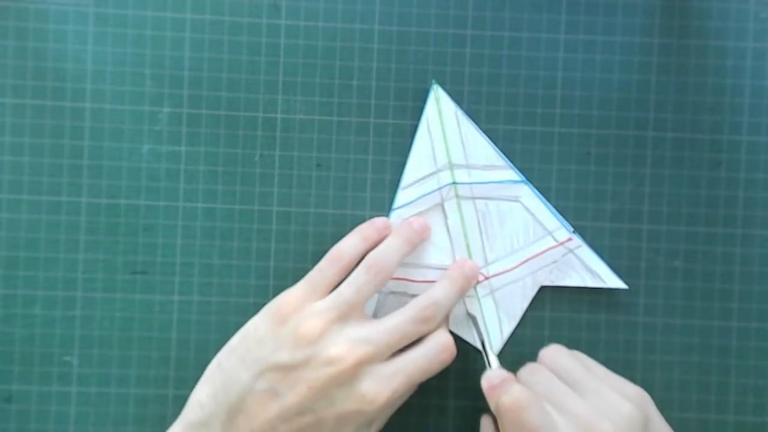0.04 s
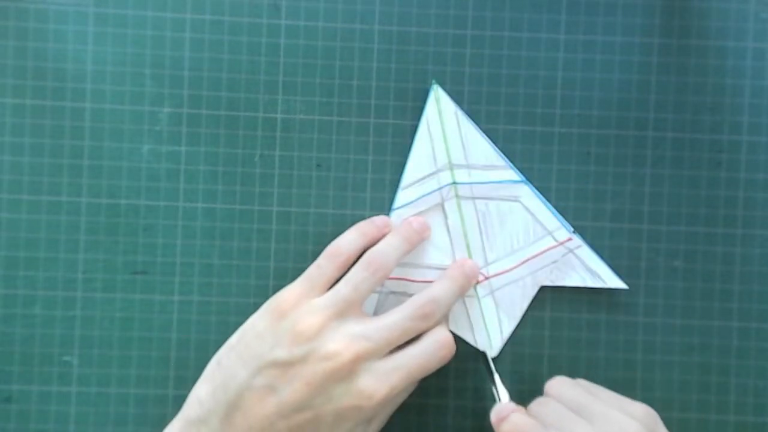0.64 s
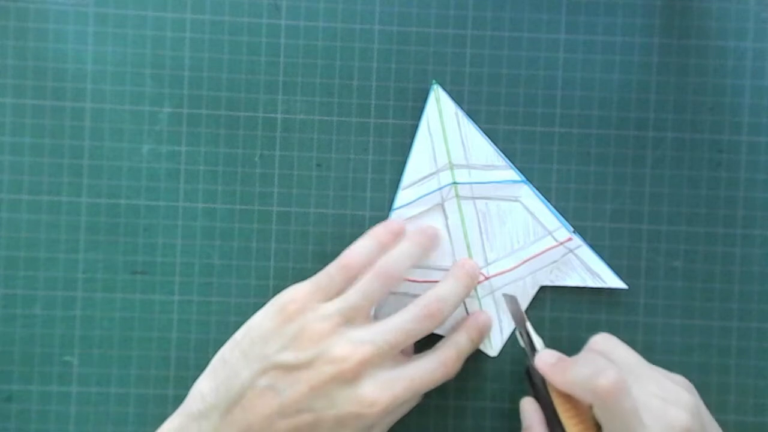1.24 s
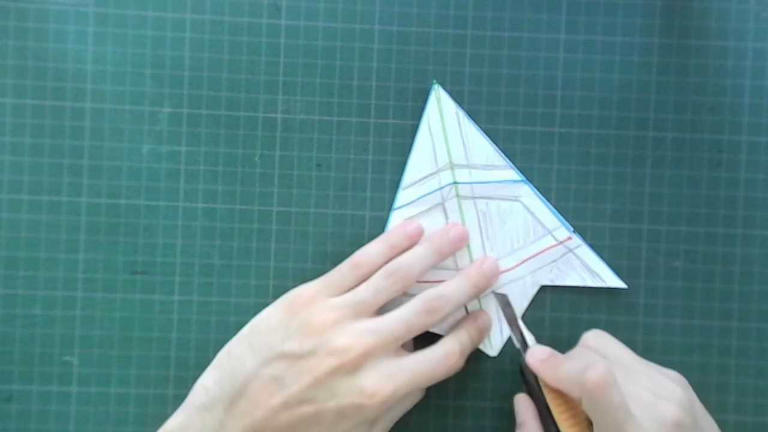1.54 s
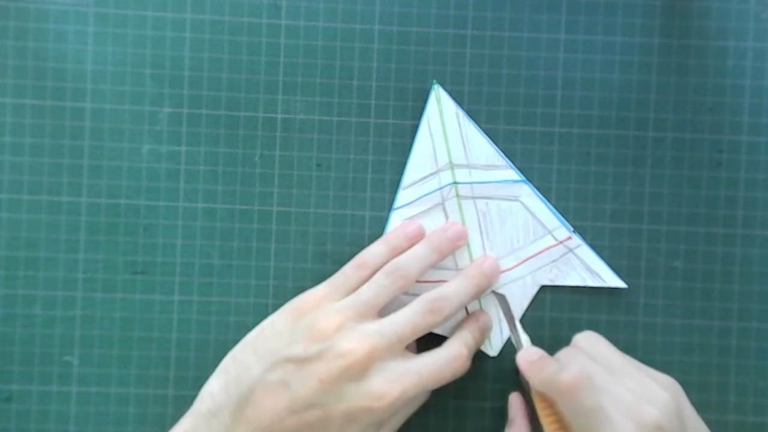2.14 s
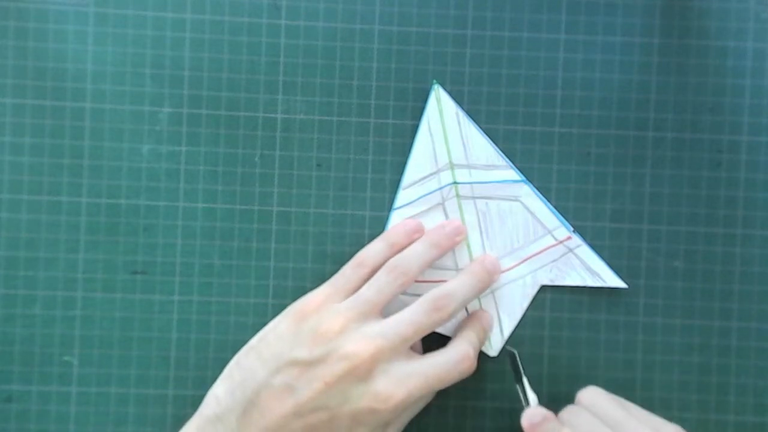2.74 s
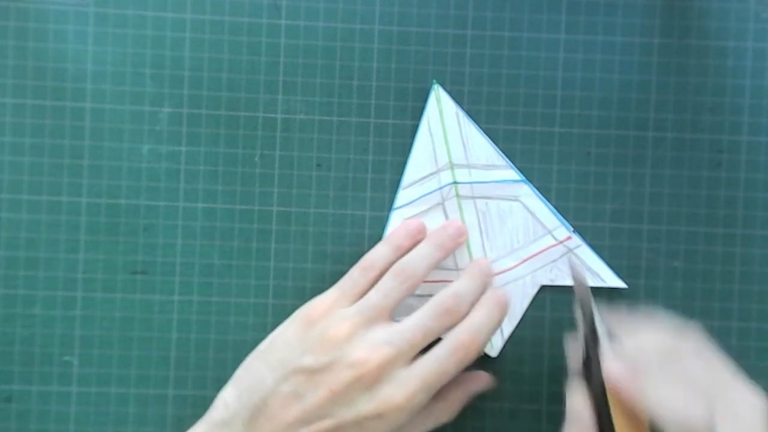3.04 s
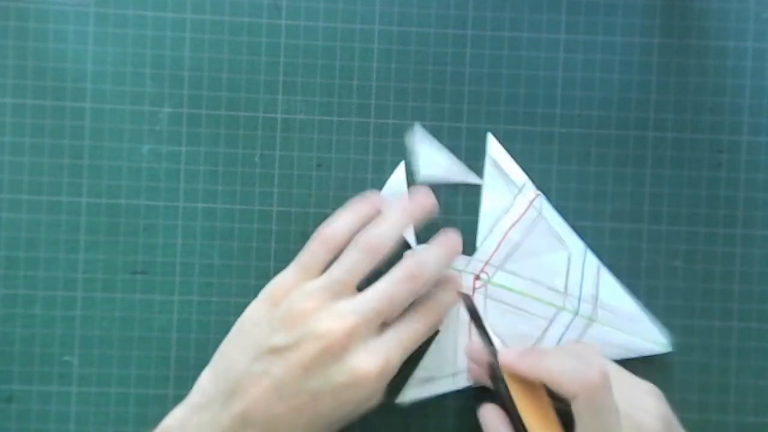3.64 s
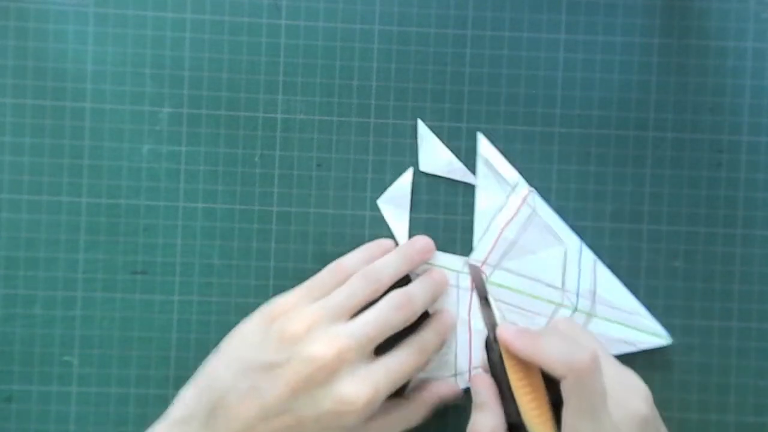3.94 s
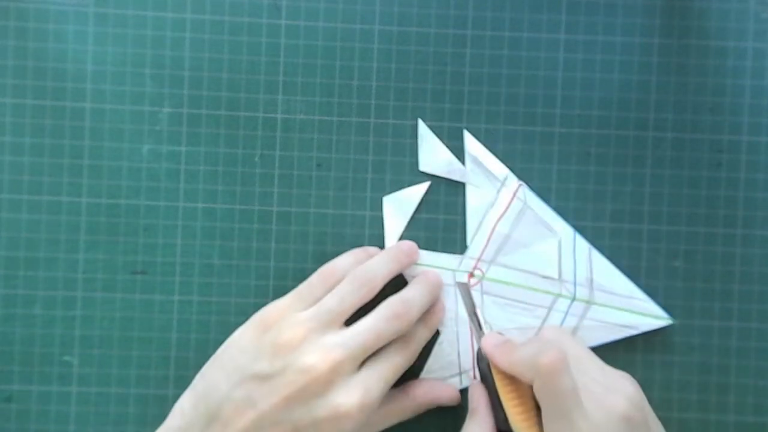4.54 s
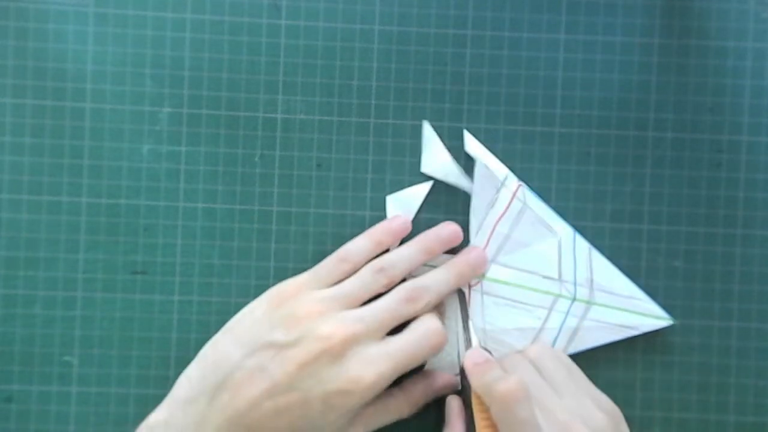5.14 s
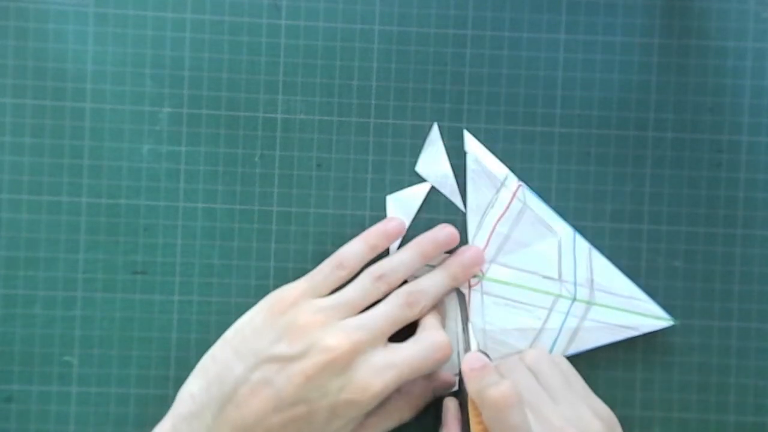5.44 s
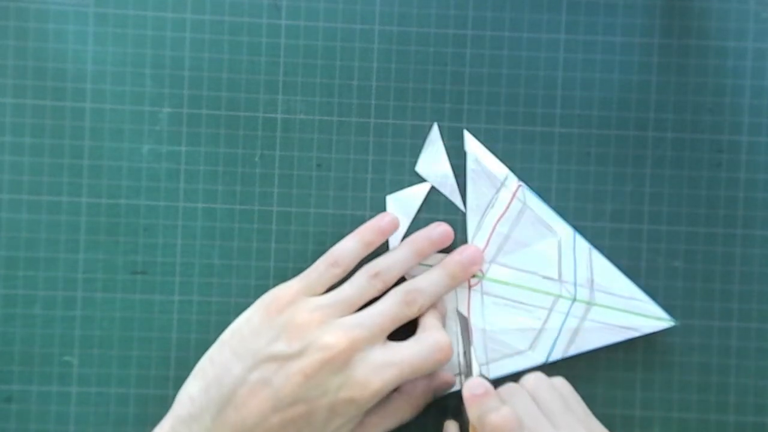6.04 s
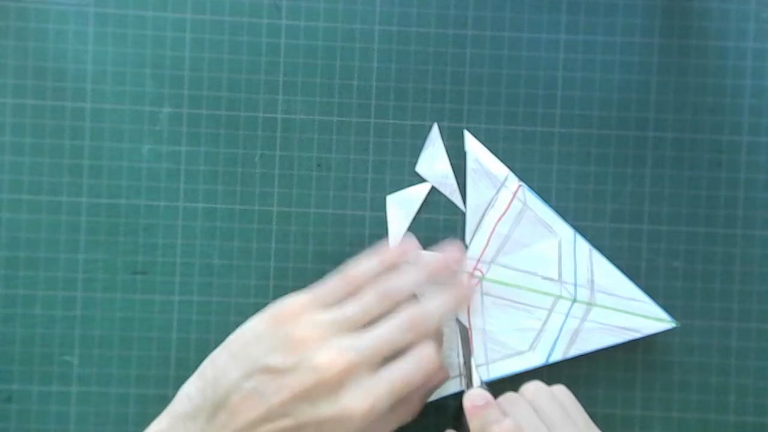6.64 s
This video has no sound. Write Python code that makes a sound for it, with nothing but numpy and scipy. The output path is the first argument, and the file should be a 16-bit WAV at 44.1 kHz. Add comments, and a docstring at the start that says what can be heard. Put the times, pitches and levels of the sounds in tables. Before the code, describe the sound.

Slow, quiet knife strokes cut folded paper indoors, mixed with blade clicks, paper sliding and soft thumps on a rumbling desk.

```python
"""First comes the soft rasp of a craft knife cutting folded paper on a mat, over a low desk rumble.
The blade catches on countless fibres in slow strokes, and the folds tick under the fingers.
Hands bump the desk, which booms softly; the blade snaps over the paper's edges; the sheet is
slid round with a swish, and the knife point taps down. The small room rings after each click."""
import sys
import numpy as np
from scipy import signal
from scipy.fft import rfft, irfft, next_fast_len
from scipy.io import wavfile

SR = 44100
rng = np.random.default_rng(int(sys.argv[2]) if len(sys.argv) > 2 else 0)


def wav_out(sig):
    """Save sig, one row per channel (or a flat mono array), as 16-bit PCM at SR to the path in sys.argv[1]."""
    wavfile.write(sys.argv[1], SR, np.round(np.clip(np.atleast_2d(sig).T, -1, 1) * 32767).astype(np.int16))


N = 303849
TIME, FREQS = np.arange(N) / SR, np.fft.rfftfreq(N, 1 / SR)
TOP_HZ = 15950


def amp(db):
    """Turns decibels into a gain. Gains multiply, so the levels in the tables are relative."""
    return 10 ** (np.asarray(db) / 20)

def unit(x):
    """Scales a signal to an average strength (rms) of 1."""
    return x / np.sqrt(np.mean(x ** 2) + 1e-20)

def read(points, hz):
    """Reads between a table's rows, with frequency spaced in octaves."""
    freqs, values = np.transpose(points)
    return np.interp(np.log(hz + 1), np.log(freqs + 1), values)

def with_peaks(tone, peaks, hz):
    """A broad tone curve with resonant peaks on top, in dB."""
    return read(tone, hz) + sum(db / (1 + (2 * (hz - f) / width) ** 2) for f, width, db in peaks)

def colour(x, db):
    """Turns each frequency of a full-length signal up or down."""
    return irfft(rfft(x) * amp(db), N)

def wander(hz):
    """A random wobble, up to about hz times a second."""
    size = next_fast_len(N, True)
    spectrum = rfft(rng.standard_normal(size)) / (1 + (np.fft.rfftfreq(size, 1 / SR) / hz) ** 4)
    return unit(irfft(spectrum, size)[:N])

def add(mix, start, sound):
    """Mixes a stereo sound in at start seconds."""
    part = mix[:, max(round(start * SR), 0):][:, :sound.shape[1]]
    part += sound[:, :part.shape[1]]

def pan(db):
    """Gains that make the left side db louder than the right."""
    return amp([[db / 2], [-db / 2]])

# how alike left and right sound: (frequency [Hz], likeness [-1 to 1])
LEFT_RIGHT_LIKENESS = [(30, -0.81), (70, 0.12), (150, 0.43), (400, 0.5), (1400, 0.5), (3000, 0.37),
                       (5000, -0.42), (7000, 0.76), (9000, 1), (15000, 1)]
def stereo(x, likeness=1.):
    """Blends two unrelated signals into left and right, alike in some bands only."""
    a, b = rfft(x)
    hz = np.fft.rfftfreq(x.shape[1], 1 / SR)
    alike = np.clip(likeness * read(LEFT_RIGHT_LIKENESS, hz), -.99, .99)
    mid, side = a * np.sqrt((1 + alike) / 2), b * np.sqrt((1 - alike) / 2)
    return irfft(np.array([mid + side, mid - side]), x.shape[1])

def stroke(start, hold, rise_db_per_s, fall_db_per_s):
    """Gain of one hand movement: it swells, holds and dies away."""
    gain, near = np.zeros(N), abs(TIME - start - hold / 2) < 1
    t = TIME[near] - start
    gain[near] = amp(-rise_db_per_s * np.maximum(-t, 0) - fall_db_per_s * np.maximum(t - hold, 0))
    return gain

def friction(strokes, tone_db, rise_db_per_s, fall_db_per_s, grains_per_s, grain_share,
             judder_db, judder_hz, drift_db, body_db, brighten, usual_db):
    """Fibres catch and give way, bunched by the hand's uneven pull; a faster stroke is brighter."""
    sizes = amp(2 * np.minimum(rng.exponential(1, N), 2))
    catches = rng.random(N) < grains_per_s / SR
    grains = unit(sizes * catches * rng.standard_normal((2, N)))
    fibres = np.sqrt(grain_share) * grains + np.sqrt(1 - grain_share) * rng.standard_normal((2, N))
    pull = amp(judder_db * wander(judder_hz) + drift_db * wander(hz=6.6))
    fibres = colour(stereo(fibres * pull), tone_db)
    body = colour(fibres, -10 * np.log10(1 + (FREQS / 3200) ** 6))  # the mat gives off the lower part
    hiss, body = unit(fibres - body), unit(body)
    treble = colour(hiss, -20 * np.log10(1 + (7000 / (FREQS + 1)) ** 6))
    level, mat_level = np.zeros((2, N))
    for start, hold, db, mat_db, _ in strokes:
        gain = amp(db) * stroke(start, hold, rise_db_per_s, fall_db_per_s)
        level = np.maximum(level, gain)
        mat_level = np.maximum(mat_level, gain * amp(body_db + mat_db))
    extra_treble = (level / amp(usual_db) + 1e-9) ** brighten - 1
    return level * (hiss + treble * extra_treble) + mat_level * body

# knife strokes: (time at full speed [s], hold [s], level [dB], mat above level [dB], rumble [dB])
CUTS = [(0, 0.06, -61, -10, -49), (.16, 0.22, -65, -9.5, -49), (2.301, .1, -55, -10, -43.5),
        (5.66, 0.037, -65.5, -7.5, -48.5), (5.842, .34, -72.5, -5.5, -53)]
# tone of the rasp: (frequency [Hz], level [dB])
RASP_TONE = [(150, -31), (300, -6), (650, -8.5), (1100, -15.5), (2400, -17), (4200, -13.5), (6000, -11.5),
             (8500, -10.5), (10000, -13.5), (12000, -12.5), (15800, -17.5)]
# resonances of the blade sunk in paper and mat: (frequency [Hz], width [Hz], boost [dB])
SUNK_BLADE_PEAKS = [(1440, 520, 5), (1890, 170, 5.5), (3000, 380, 4.5), (3620, 93, 6), (4790, 240, 6),
                    (5240, 390, 7), (6070, 460, 5), (6980, 350, 7.5), (7740, 420, 8.5), (8480, 330, 7),
                    (9300, 380, 6), (10300, 260, 3.5)]
def knife_cuts():
    """The blade rasps as it is drawn through the paper's fibres."""
    return friction(CUTS, with_peaks(RASP_TONE, SUNK_BLADE_PEAKS, FREQS),
                    rise_db_per_s=124, fall_db_per_s=126, grains_per_s=1400, grain_share=0.35,
                    judder_db=-0.16, judder_hz=112, drift_db=2.03,
                    body_db=3.5, brighten=0.19, usual_db=-50)

# tone of the desk's rumble: (frequency [Hz], level [dB])
RUMBLE_TONE = [(20, -29), (32, -5.5), (45, 7), (85, 5), (135, -16), (175, -6.5), (230, -16.5), (320, -31.5),
               (600, -34.5), (1500, -57.5)]
# desk resonances that stand out of it: (frequency [Hz], width [Hz], boost [dB])
DESK_PEAKS = [(52.7, 11, 4), (167, 43, 2.5)]
# how the rumble leans to one side: (frequency [Hz], left minus right [dB])
RUMBLE_LEAN = [(25, 1.5), (60, -6.5), (110, 9), (170, 5), (260, -7), (1000, -3.5)]
# the desk's deep sway: (time [s], level [dB])
DESK_SWAY = [(0.0, -52), (0.23, -65), (0.34, -49), (1.23, -47), (2.01, -71), (2.55, -49.5), (2.92, -55.5),
             (3.4, -46.5), (4.07, -58), (5.95, -54), (5.97, -58), (6.89, -60)]
def desk_rumble(resting_db=-61.5, sway_hz=21, sway_width_hz=3):
    """The desk rumbles under the hand's weight with every cut and slide, and sways under the arms."""
    pushes = [amp(db) * stroke(start, hold, rise_db_per_s=108, fall_db_per_s=34)
              for start, hold, _, _, db in CUTS + SLIDES]
    weight = np.sqrt(amp(resting_db) ** 2 + sum(push ** 2 for push in pushes))
    tone_db = with_peaks(RUMBLE_TONE, DESK_PEAKS, FREQS) + np.outer([.5, -.5], read(RUMBLE_LEAN, FREQS))
    rumble = unit(colour(stereo(rng.standard_normal((2, N))), tone_db))
    sway_tone_db = -20 * np.log10(1 + ((FREQS - sway_hz) / sway_width_hz) ** 2)
    sway = unit(colour(stereo(rng.standard_normal((2, N)), likeness=-.4), sway_tone_db))
    sway_level = amp(1 + np.interp(TIME, *np.transpose(DESK_SWAY)))
    return rumble * weight + sway * pan(db=1) * sway_level

# tone of the quiet room: (frequency [Hz], level [dB])
AIR_TONE = [(15, -19), (30, -18.5), (49, -8), (126, -25.5), (300, -25.5), (390, -25), (530, -29.5),
            (750, -34.5), (1400, -36.5), (1930, -40), (4700, -46.5), (7800, -47), (14600, -52.5),
            (15800, -55)]
# hum in the room: (pitch [Hz], level [dB])
HUM_NOTES = [(49, -64.5), (172, -90), (351, -83)]
def background(air_db=-74.5):
    """Faint room noise and a wavering hum."""
    air = colour(stereo(rng.standard_normal((2, N))), read(AIR_TONE, FREQS))
    air /= np.std(colour(air, -100. * (FREQS < 300)))  # the part above 300 Hz sets the level
    hum = sum(amp(db) * np.sqrt(2) * np.sin(2 * np.pi * hz * TIME + 0.94 * wander(hz=5.8))
              for hz, db in HUM_NOTES)
    return amp(air_db) * air + hum

def struck(tone_db):
    """How a thing with this tone curve answers one sharp hit, starting at once."""
    log_gain = np.log(amp(np.concatenate([tone_db, tone_db[-2:0:-1]])))
    return np.fft.ifft(np.exp(np.conj(signal.hilbert(log_gain)))).real

# tones of a bright click and of the mat's dull knock: (frequency [Hz], level [dB])
CLICK_TONE = [(100, -31), (700, -36.5), (1200, -11.5), (1800, -3.5), (3500, -8), (6000, 3), (9000, 7),
              (12000, 3), (16000, 0)]
KNOCK_TONE = [(100, -17.5), (300, 2.5), (480, -1.5), (750, -2.5), (1200, -3), (2000, -9), (4000, -47),
              (16000, -56)]
# resonances of the knife and of the mat: (frequency [Hz], width [Hz], boost [dB])
KNIFE_PEAKS = [(2940, 350, 6.5), (3654, 850, 12), (4560, 400, 4.5), (4710, 330, 2.5), (5170, 400, 3),
               (7350, 970, 2.5)]
MAT_PEAKS = [(466, 69, 8), (687, 92, 5.5), (1220, 350, -2)]
def click(db, crisp_db, knock_db, tear_s, ring_hz, ring_db=5.5, size=2048):
    """A tiny tear rings the blade and knocks on the mat; loose fibres crumble after it."""
    t, hz = np.arange(size) / SR, np.fft.rfftfreq(size, 1 / SR)
    onset, crumble = 1 - np.exp(-t / 0.00066), amp(-19) * np.exp(-t / 0.0033)
    shape = onset * (np.exp(-(t / tear_s) ** 2) + crumble)
    tear = stereo(rng.standard_normal((2, size)), likeness=.3) * shape
    tear *= np.sqrt(tear_s * SR / (tear ** 2).sum(1, keepdims=True))
    treble = 1 / (1 + (8600 / (hz + 1)) ** 9)  # where crispness acts
    contact_peak = (ring_hz, ring_hz / 5, ring_db)  # each kind of contact favours one ring
    blade_db = with_peaks(CLICK_TONE, [*KNIFE_PEAKS, contact_peak], hz)
    blade_db -= 10 * np.log10(np.mean(amp(blade_db) ** 2 * (1 - treble)))
    mat = struck(with_peaks(KNOCK_TONE, MAT_PEAKS, hz))
    response = struck(blade_db + treble * crisp_db) + amp(knock_db) * mat / np.linalg.norm(mat)
    return amp(db) * signal.fftconvolve(tear, response[None], axes=1)

# the clearer ticks of the folds: (time [s], level [dB])
FOLD_TICKS = [(.429, -67), (1.259, -65.5), (1.785, -76), (2.479, -61), (3.169, -66), (3.209, -65),
              (3.847, -61.5), (4.998, -71), (5.049, -70), (5.2165, -66.5), (6.763, -72)]
def paper_ticks(strays_per_s=4, stray_db=-78, spread_db=2):
    """The folds tick crisply under the fingers, with many fainter ticks at random times."""
    chance = rng.random((int(strays_per_s * N / SR), 2))
    strays = [(when * N / SR, stray_db + spread_db * (2 * strength - 1)) for when, strength in chance]
    out = np.zeros((2, N))
    for start, db in FOLD_TICKS + strays:
        add(out, start, click(db, crisp_db=-2, knock_db=-6.5, tear_s=0.0042, ring_hz=8150))
    return out

def ring(notes, rise_s, tilt_db=0):
    """A struck object's notes die away, each a little out of step between left and right."""
    t = np.arange(SR // 2) / SR
    phases = rng.uniform(-1.63, 2.09, (len(notes), 2, 1))
    waves = sum(amp(db + tilt_db * np.log2(hz / 70) - 60 * t / fade_s)
                * np.sin(2 * np.pi * hz * t + phase) for (hz, db, fade_s), phase in zip(notes, phases))
    return waves * (1 - np.exp(-t / rise_s))

# hands and knife bump the desk: (time [s], level [dB], hardness [dB per octave])
DESK_BUMPS = [(0.674, -39, -9.5), (1.105, -43, -6.5), (1.587, -44.5, 1), (1.929, -37.5, 0),
              (2.721, -32.5, -1), (2.743, -35.5, -8), (3.112, -40, -17), (3.606, -28.5, -8),
              (4.59, -56.5, 7), (4.832, -41.5, -4), (4.96, -42, -1), (5.007, -29, -14.5),
              (5.074, -34.5, -3), (5.149, -40, 3), (5.228, -49.5, 6.5), (5.295, -43, 1.5), (6.252, -41, -6),
              (6.475, -36, -4.5), (6.83, -40, -10.5)]
# the desk's own notes: (pitch [Hz], level [dB], time to fade by 60 dB [s])
DESK_LOW_NOTES = [(52.1, -2, 0.29), (66.3, 2.5, 0.24), (86, 3.5, .14), (115.2, -1, 0.22)]
DESK_HIGH_NOTES = [(172.8, 4.5, 0.2), (209.3, -6.5, 0.31), (266, -24.5, 0.35), (355, -24, 0.24),
                   (473, -19, 0.11), (696, -22.5, 0.08)]
def desk_bumps(low_db=-3, high_db=-9):
    """A heavy hand booms the desk's low notes; a harder knock wakes the upper ones."""
    out = np.zeros((2, N))
    for start, db, hardness in DESK_BUMPS:
        boom = amp(db + low_db) * ring(DESK_LOW_NOTES, rise_s=0.008, tilt_db=hardness)
        knock = amp(db + high_db + 1.6 * hardness) * ring(DESK_HIGH_NOTES, rise_s=0.0031)
        add(out, start, boom + pan(db=4.5) * knock)
    return out

# snaps over an edge, and at 1.399 s the knife point landing with its 1830 Hz ring: (time [s], level [dB], extra
# treble [dB], knock above level [dB], ring [Hz])
EDGE_SNAPS = [(.676, -49, -2, -6, 3700), (0.685, -54, 2, -8, 5000), (0.6898, -48.5, 4, -24, 7660),
              (0.737, -55, -11, -14, 9000), (.859, -54.5, -18.5, -24, 6300),
              (0.9252, -58, -10, -18.5, 5900), (0.9798, -62.5, -9, -33, 5240), (1.28, -57, -8, -33, 7050),
              (1.3903, -57, -8, -19, 3770), (1.399, -50.5, -2.5, -32, 1830), (1.585, -57.5, -17, -16, 2800),
              (1.931, -58.5, -20, 3, 4200), (2.7438, -40.5, -4.5, -20, 3650),
              (3.0686, -56, -7.5, -17, 6370), (4.006, -60, -9, -26, 4300), (4.7912, -68, -12, -1.5, 3380),
              (4.884, -67.5, -15, -3, 3520)]
# the thin steel's own notes: (pitch [Hz], level [dB], time to fade by 60 dB [s])
BLADE_NOTES = [(3030, -3, 0.3), (3880, -2, 0.2), (3800, -12, .3), (4414, 2, 0.23), (4800, -1, 0.38),
               (5706, -1, 0.31), (7270, -15, .24)]
def blade_snaps(steel_db=-23, free_db=-48, free_range_db=3):
    """The blade clicks off the paper's edge; a hard snap throws it clear, so it rings on."""
    out = np.zeros((2, N))
    for start, db, crisp_db, knock_db, ring_hz in EDGE_SNAPS:
        freedom = 1 / (1 + np.exp((free_db - db) / free_range_db))  # 0 held by the paper, 1 clear
        add(out, start, click(db, crisp_db, knock_db, tear_s=0.0035, ring_hz=ring_hz))
        add(out, start, freedom * amp(db + steel_db) * ring(BLADE_NOTES, rise_s=0.0017))
    return out

# sheet moves: (time at full speed [s], hold [s], level [dB], mat above level [dB], rumble [dB])
SLIDES = [(.8, 0.009, -78, 2.5, -56), (3.15, .02, -72.5, -5, -64), (3.254, 0.05, -57, -11, -49.5),
          (3.31, 0.19, -55.5, -13.5, -51), (3.68, 0.012, -68, -7, -50), (3.87, 0.022, -65.5, -13, -60.5),
          (4.07, 0.021, -73.5, -11, -67), (4.87, 0.012, -77, -2, -60), (5.01, 0.029, -74.5, -0.5, -53),
          (5.24, .02, -85, 1, -49.5), (6.42, 0.083, -76, -16, -58.5), (6.569, 0.01, -72.5, -10, -61)]
# tone of the swish: (frequency [Hz], level [dB])
SWISH_TONE = [(150, -38), (350, -16), (700, -7), (1100, -9), (1500, -3.5), (4300, -7.5), (6600, -6.5),
              (8000, -3.5), (9500, -8), (12000, -8), (15800, -16)]
# resonances of the folded sheet: (frequency [Hz], width [Hz], boost [dB])
SHEET_PEAKS = [(2880, 870, 3.5), (3830, 230, 4.5), (6140, 890, 3.5), (7940, 530, 2), (8750, 550, 2)]
def paper_slides():
    """Paper and fingers swish as they rub over the mat."""
    return friction(SLIDES, with_peaks(SWISH_TONE, SHEET_PEAKS, FREQS),
                    rise_db_per_s=268, fall_db_per_s=146, grains_per_s=1800, grain_share=0.14,
                    judder_db=0.94, judder_hz=60, drift_db=1.5,
                    body_db=0, brighten=0.036, usual_db=-61)

# the knife point is set down: (time [s], level [dB], knock above level [dB])
POINT_TAPS = [(1.579, -54, -30), (2.7185, -52.5, -6), (4.3692, -64.5, -27), (4.5872, -64, -6),
              (5.1485, -71, 5), (6.4324, -61.5, -7.5), (6.441, -76, -8), (6.4736, -65.5, 2.5)]
def knife_taps():
    """The point lands in the folded paper with a short, dull click."""
    out = np.zeros((2, N))
    for start, db, knock_db in POINT_TAPS:
        tap = click(db, crisp_db=-17.5, knock_db=knock_db, tear_s=0.0018, ring_hz=1740, ring_db=15.5)
        add(out, start, tap)
    return out

# how long the room rings: (frequency [Hz], time to fade by 60 dB [s])
ROOM_FADE = [(100, 0.72), (500, 0.59), (1400, 0.57), (3700, 0.65), (7000, 0.6), (10000, 0.44),
             (16000, 0.49)]
def room(x, treble_db, early_db, early_s=0.0078):
    """Close echoes off the desk, then a blurred tail, each band dying at its own speed."""
    hz, t, bands = signal.stft(stereo(rng.standard_normal((2, SR))), SR, nperseg=256)
    bands *= amp(-60 * t / read(ROOM_FADE, hz)[:, None] + treble_db * hz[:, None] / TOP_HZ)
    tail = signal.istft(bands, SR)[1][:, :SR]
    tail *= 1 + amp(early_db) * np.exp(-TIME[:SR] / early_s)
    tail *= TIME[:SR] > .003  # the first echo takes 3 ms to arrive
    return signal.fftconvolve(x, tail / np.linalg.norm(tail[0]), axes=1)[:, :N]

def shifting_room(x, count=3, turn_hz=0.93):
    """The hands move between snaps, so the pattern of echoes keeps changing."""
    fades = [np.cos(np.pi * (turn_hz * TIME + k / count)) ** 4 for k in range(count)]
    total = np.sqrt(sum(fade ** 2 for fade in fades))
    return sum(room(x * fade / total, treble_db=-11, early_db=4.5) for fade in fades)

def scene():
    """Cuts, slides and clicks with their echoes, over the sounds of desk and room."""
    rubbing = amp(-1.04) * pan(db=0.1) * knife_cuts() + amp(-0.94) * pan(db=0.9) * paper_slides()
    clicks = amp(3) * pan(db=-0.2) * (blade_snaps() + knife_taps() + paper_ticks())
    echo = amp(-1.5) * shifting_room(clicks) + amp(-4.5) * room(rubbing, treble_db=-24.5, early_db=7)
    return rubbing + clicks + echo + desk_bumps() + desk_rumble() + background()

def record(dry):
    """Removes the highest treble, above TOP_HZ."""
    low_pass = signal.firwin(511, TOP_HZ, window=("kaiser", 8), fs=SR)
    return signal.oaconvolve(dry, low_pass[None], "same")


dry = scene()
out = record(dry)
wav_out(out)
```